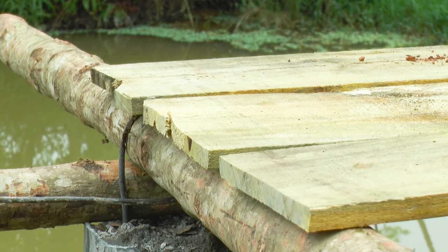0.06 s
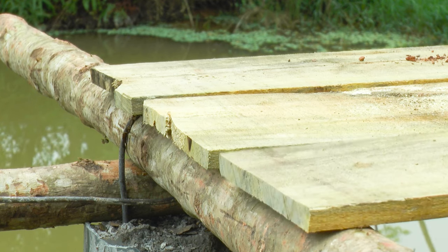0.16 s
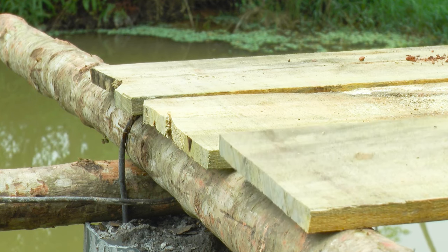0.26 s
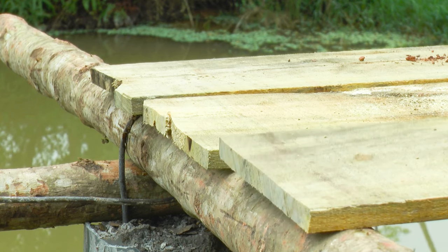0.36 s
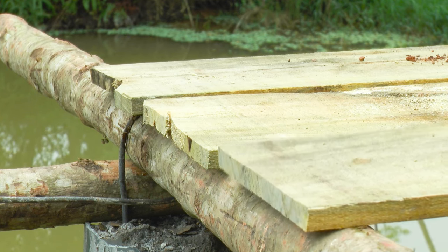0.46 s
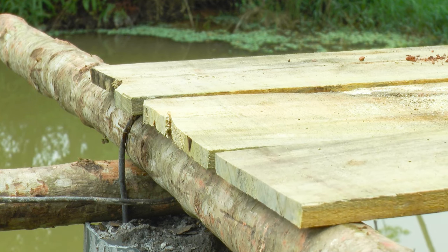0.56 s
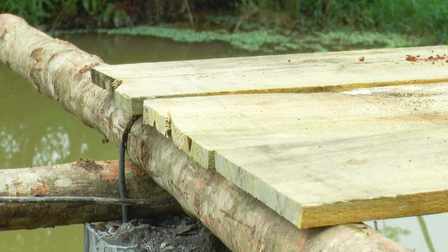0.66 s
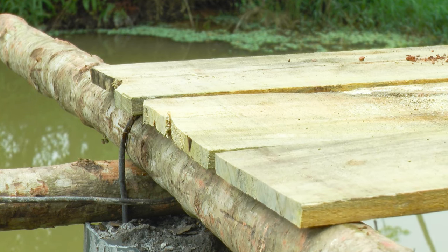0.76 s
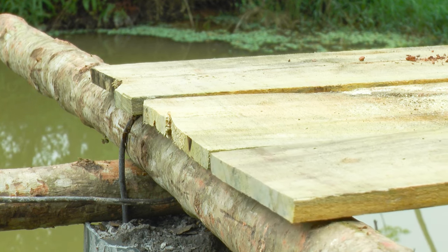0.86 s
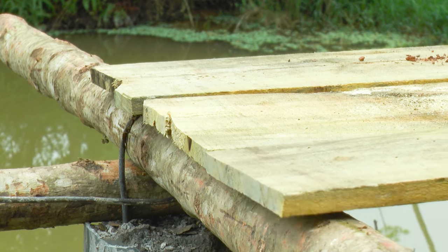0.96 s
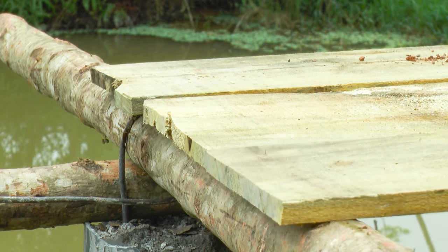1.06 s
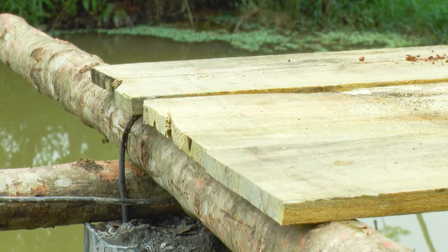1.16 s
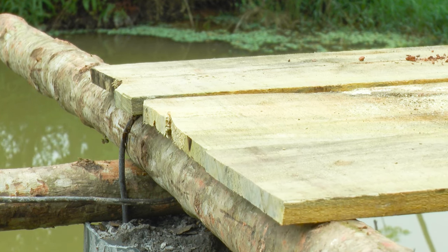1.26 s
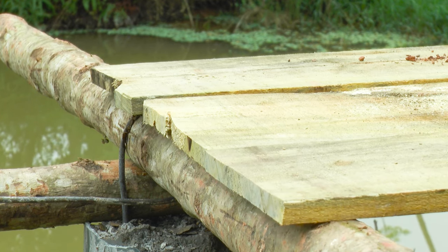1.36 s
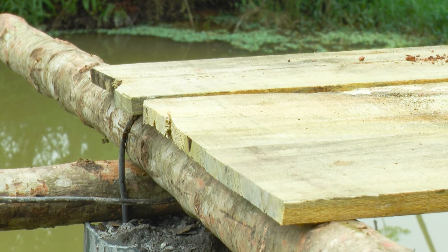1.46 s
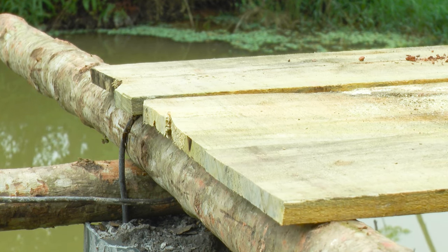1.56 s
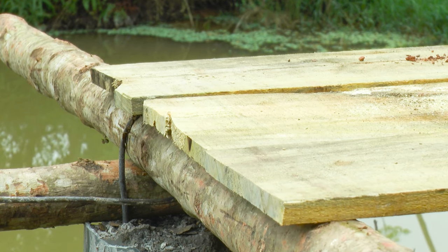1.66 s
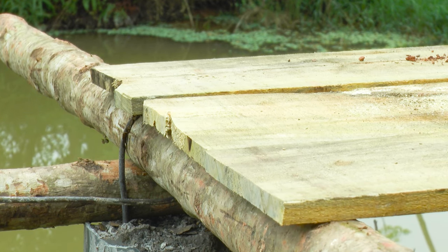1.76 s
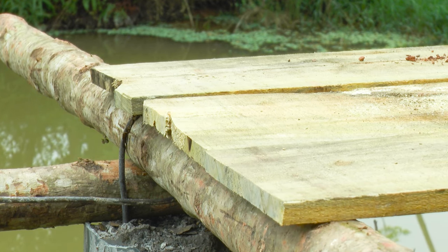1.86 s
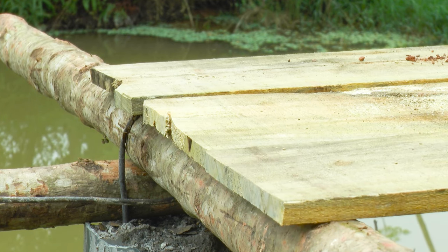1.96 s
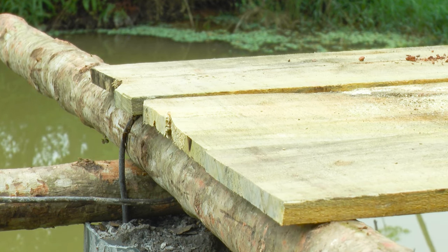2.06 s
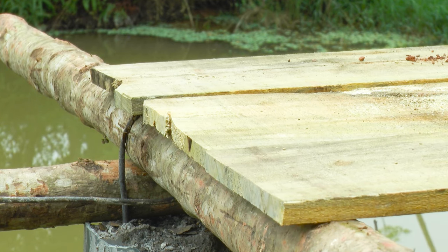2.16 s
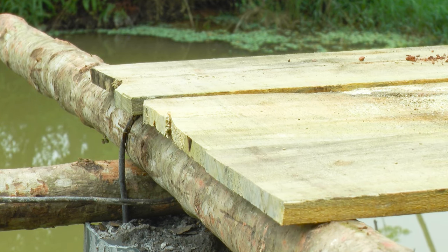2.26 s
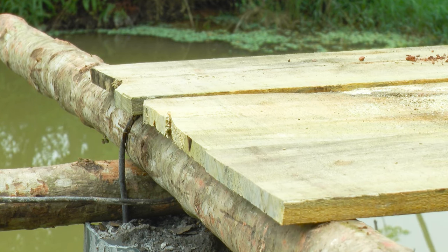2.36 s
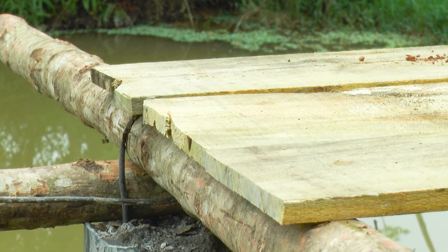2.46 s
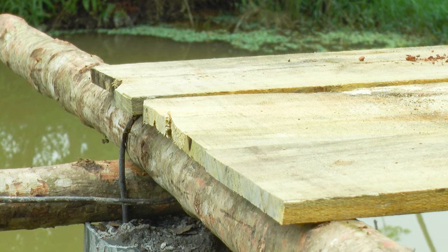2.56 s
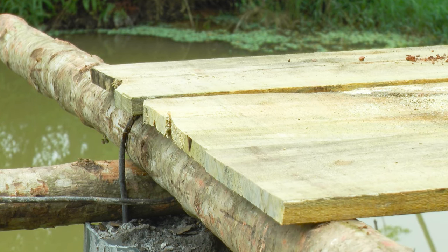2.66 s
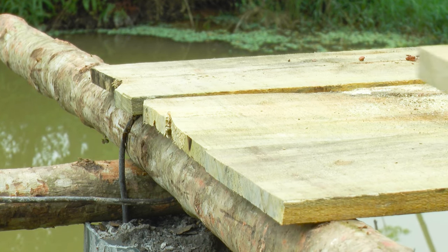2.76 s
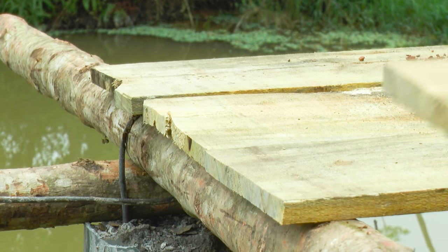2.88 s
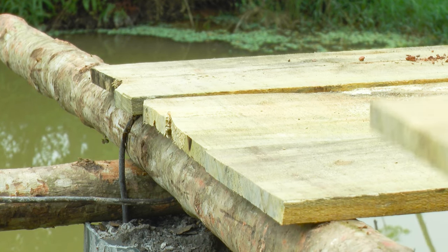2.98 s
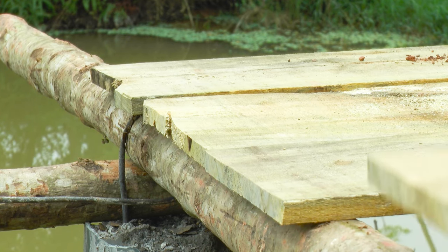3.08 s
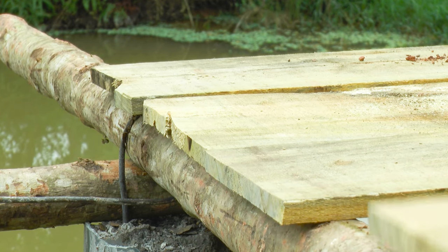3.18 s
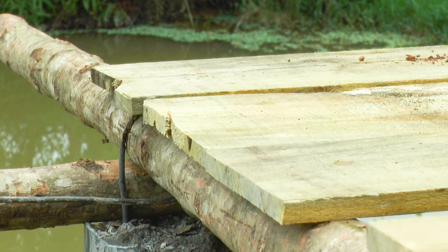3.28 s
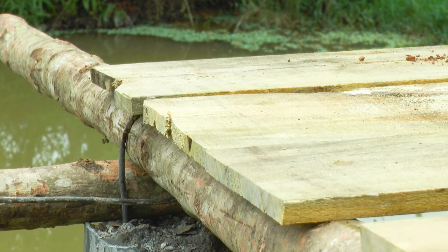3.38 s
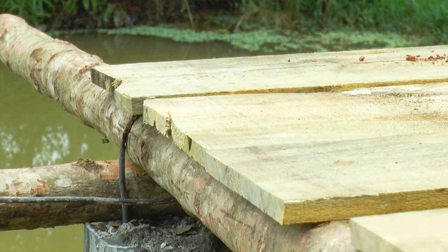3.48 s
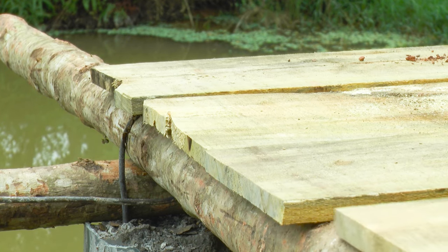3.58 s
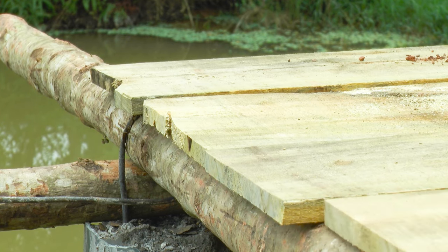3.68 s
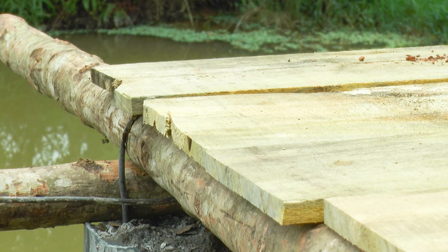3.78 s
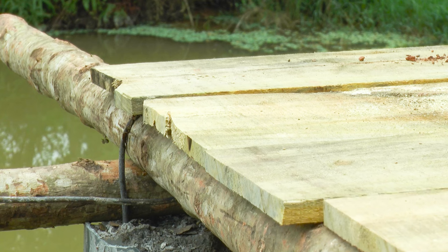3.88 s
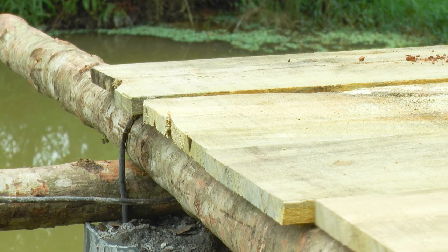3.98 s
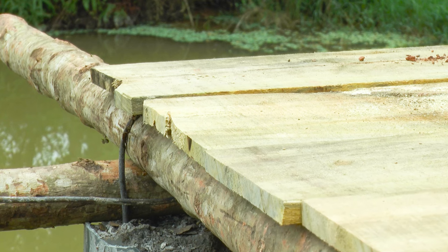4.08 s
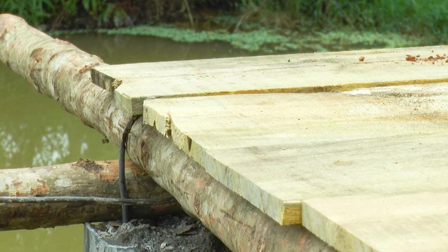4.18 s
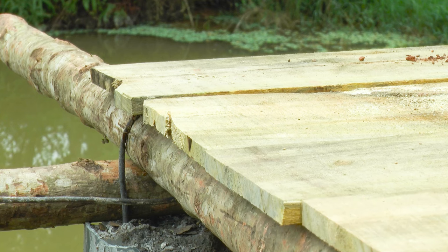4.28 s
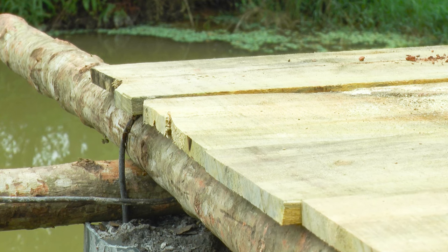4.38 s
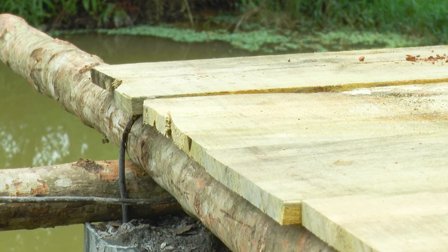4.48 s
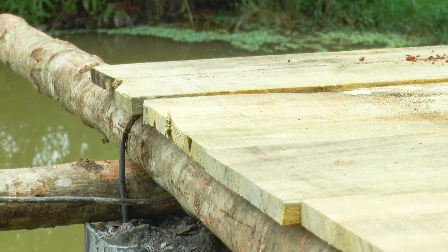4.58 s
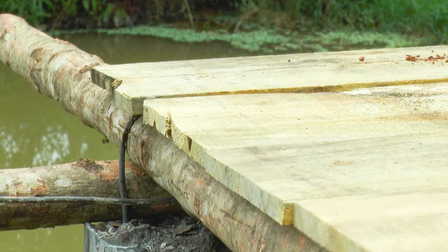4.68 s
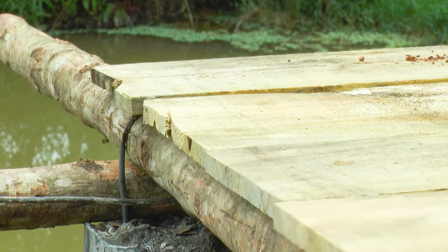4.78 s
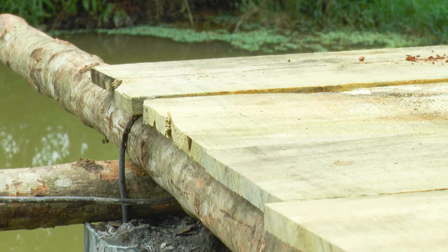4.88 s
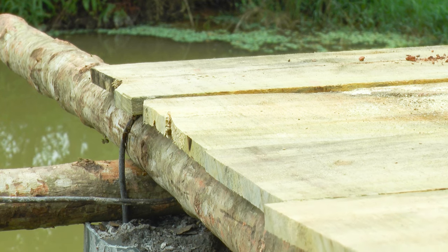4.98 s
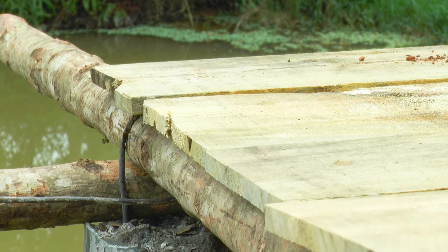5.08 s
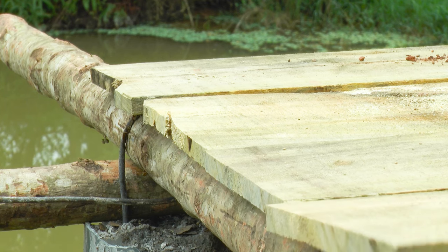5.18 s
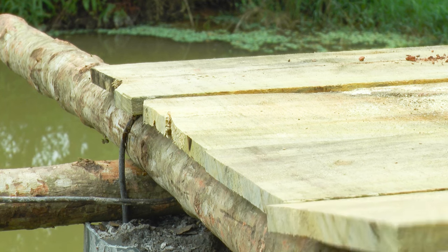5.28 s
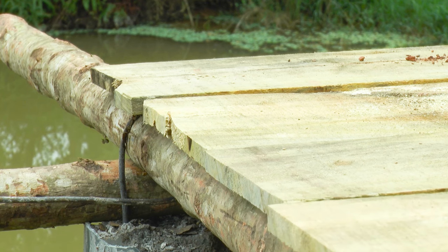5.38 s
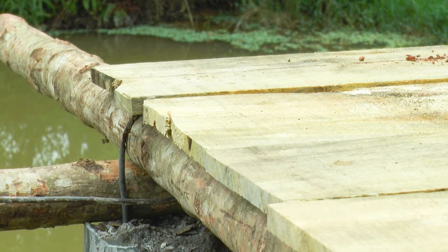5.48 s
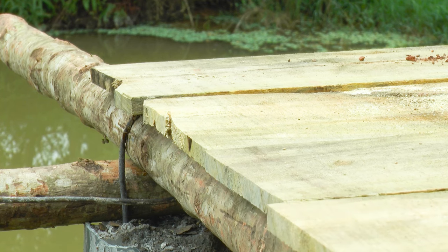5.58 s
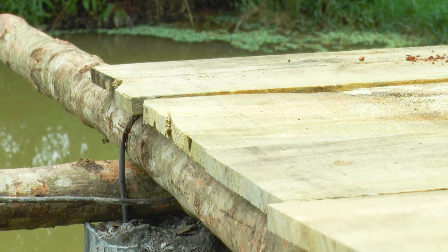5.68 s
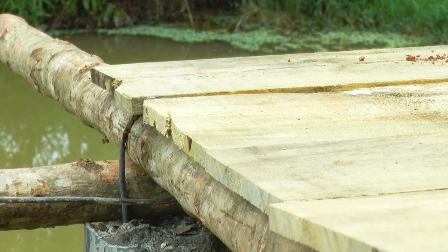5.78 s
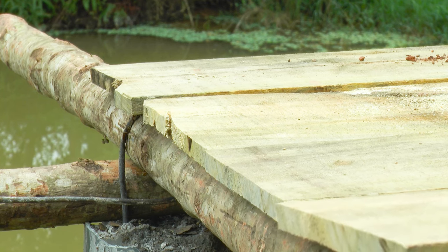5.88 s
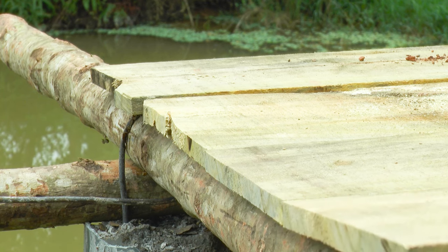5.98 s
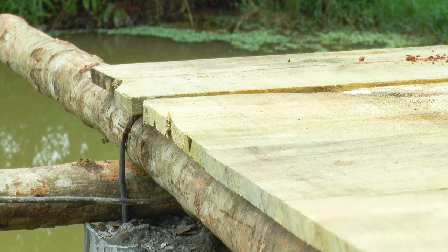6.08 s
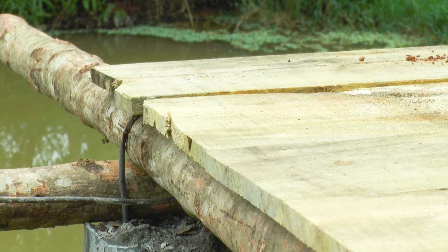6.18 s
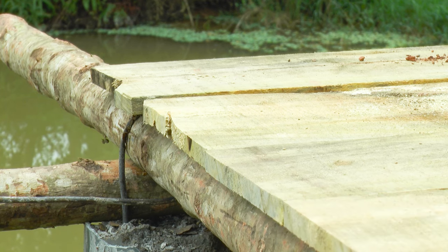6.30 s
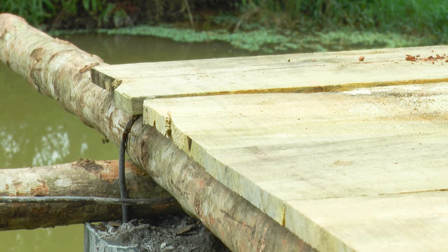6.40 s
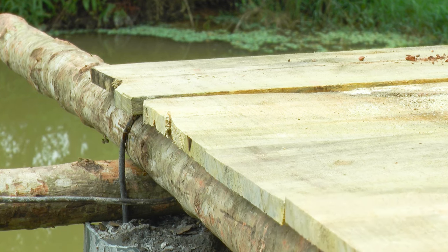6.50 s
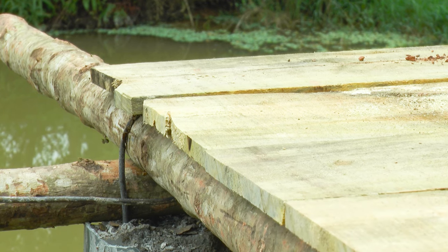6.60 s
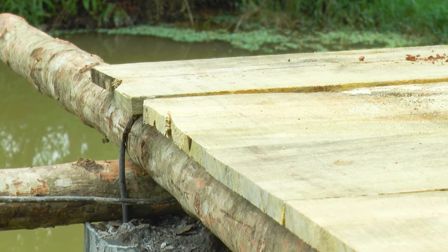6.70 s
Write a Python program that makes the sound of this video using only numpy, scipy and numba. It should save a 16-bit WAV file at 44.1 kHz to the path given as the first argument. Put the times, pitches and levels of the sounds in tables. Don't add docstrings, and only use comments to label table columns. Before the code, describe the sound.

Rough wooden boards scrape and clatter onto a log frame outdoors, with two loud drops, then hollow knocks over soft leafy air and distant engine hum.

```python
import sys
import numpy as np
from scipy import signal
from scipy.fft import rfft, irfft, next_fast_len
from scipy.io import wavfile
from scipy.ndimage import uniform_filter1d
from numba import njit

SR = 44100
rng = np.random.default_rng(int(sys.argv[2]) if len(sys.argv) > 2 else 0)


def digitize_waveform(pressure):
    field = np.atleast_2d(pressure).T
    bounded = np.clip(field, -1, 1)
    quanta = np.round(bounded * 32767).astype(np.int16)
    wavfile.write(sys.argv[1], SR, quanta)


def volts_from_db(level):
    exponent = np.asarray(level, float) / 20
    return 10 ** exponent


N = 297234

# (frequency [Hz], density [dB/Hz])
AIR_SPECTRUM = [(15, -53), (25, -10.5), (59, 1), (141, 1), (235, -10), (352, -8), (473, -17.5), (1550, -20),
                (2200, -23.5), (3300, -25), (4210, -30.5), (6310, -32.5), (8970, -41.5), (14200, -49.5),
                (15800, -54)]
# (time [s], gain [dB])
RECORDER_GAIN = [
    (0, 5),
    (1.1, 5.5),
    (1.14, -9.5),
    (1.6, -1.5),
    (2.4, 0),
    (3.2, 0.5),
    (4.5, 2.5),
    (5.5, 1.5),
    (6.74, 5.5),
]
# (time [s], drone level [dB], whine level [dB])
ENGINE_LEVELS = [
    (0, -71.5, -74),
    (3.5, -62, -88),
    (4.3, -58.5, -73.5),
    (4.5, -52, -73.5),
    (5.0, -61, -71),
    (5.3, -49, -64.5),
    (5.6, -54, -99),
    (6.2, -48, -80),
    (6.74, -55, -92),
]
# (peak time [s], swell [s], fade [s], level [dB])
LEAF_RUSTLES = [
    (3.53, 0.075, 0.074, -72),
    (3.63, 0.076, 0.076, -64.5),
    (3.735, 0.025, 0.018, -67),
]
# (time [s], level [dB], t60 [s])
SPLINTER_TICKS = [(0.621, -50, 0.0095), (1.952, -47, 0.013), (2.604, -38, 0.01), (2.6126, -46, 0.014),
                  (2.859, -61, 0.011), (3.322, -41, 0.0092), (3.378, -44.5, 0.011), (3.752, -49, 0.01),
                  (4.832, -40, 0.014), (5.7, -50, 0.0089), (6.385, -41, 0.07), (6.404, -43.5, 0.044),
                  (1.112, -43, 0.014)]
# (time [s], frequency [Hz], level [dB], fade to 1/e [cycles])
CORNER_PINGS = [(0.308, 2300, -55, 4.6), (0.31, 860, -47, 2.7), (0.601, 3540, -52, 4.6),
                (0.621, 2320, -44, 4), (0.621, 1600, -46, 4), (0.805, 286, -40, 1.2), (0.826, 2870, -54, 8),
                (0.978, 695, -28, 2.5), (0.992, 260, -46, 0.85), (1.052, 1710, -20.5, 3.3),
                (1.0765, 1830, -30, 5.1), (1.007, 209, -36.5, 2.2), (1.021, 188, -36.5, 2.4),
                (1.0906, 318, -25, 1.3), (1.0945, 790, -27, 4.9), (1.118, 1960, -51, 4),
                (1.95, 2820, -49.5, 3.9), (2.583, 3180, -55, 6), (2.858, 2440, -43, 3.6),
                (2.876, 1890, -48, 11), (3.2876, 330, -17, 1.07), (3.325, 2540, -31, 2.9),
                (3.3474, 2320, -31.5, 3), (3.377, 390, -18.5, 1.4), (3.379, 3500, -47, 3.8),
                (3.383, 1800, -33.5, 4), (3.452, 2000, -50, 2.8), (3.755, 2600, -50, 5),
                (4.7673, 2440, -41, 5), (4.784, 3270, -42, 6), (4.799, 2360, -35.5, 6.9),
                (4.835, 403, -18, 0.85), (4.843, 348, -19, 1.3), (4.888, 1590, -46, 4.5),
                (5.4439, 450, -33, 1.2), (5.471, 390, -27, 1.5), (5.895, 2300, -53, 4.4),
                (5.932, 2120, -57, 5.5), (6.051, 1800, -52, 4), (6.051, 3200, -52, 4.5),
                (6.2, 480, -41, 0.91), (6.388, 2330, -40, 6.4), (6.4063, 304, -34, 1.2),
                (6.672, 505, -34, 1.3), (6.682, 1980, -54, 4.7)]

# (peak time [s], swell [s], fade [s], rasp level [dB], bright edge re rasp [dB])
SLIDES = [(0.0, .01, 0.058, -49, -5.5), (0.085, 0.11, 0.081, -47, -3), (0.13, 0.059, 0.021, -59, 1),
          (0.63, 0.17, 0.029, -55, -0.5), (0.947, 0.084, 0.11, -45.5, -3), (0.99, 0.056, 0.05, -48.5, 3.5),
          (1.69, 0.1, 0.12, -59.5, 2), (1.95, 0.96, 0.99, -68.5, -3.5), (2.18, 0.038, 0.052, -60.5, -4),
          (2.226, 0.056, 0.052, -58, -5), (2.4, 0.093, 0.054, -61, -6), (2.483, 0.08, 0.042, -51.5, -3.5),
          (2.615, 0.072, 0.13, -57.5, -3), (3.05, 0.074, 0.033, -70, 1), (3.15, 0.047, 0.072, -61.5, -1),
          (3.215, 0.028, 0.04, -51, 4), (3.245, 0.045, 0.026, -50.5, 5), (3.56, 0.69, 0.13, -59.5, -4),
          (3.667, 0.14, 0.1, -52, -3.5), (4.106, 0.1, 0.056, -54, -1), (4.75, 0.054, 0.052, -56.5, -1),
          (4.88, 0.023, 0.09, -51, -4), (5.28, 0.026, 0.033, -63.5, -0.5), (5.55, 0.032, 0.043, -54, 0.5),
          (5.595, 0.047, 0.032, -56.5, -0.5), (5.91, 0.093, .06, -64, 0.5), (6.04, 0.067, 0.034, -69, 8),
          (6.29, 0.033, 0.075, -55.5, -4), (6.34, 0.027, .05, -47.5, -6.5), (6.37, 0.054, .04, -44.5, -14),
          (6.395, 0.027, 0.048, -42, -8.5), (6.47, 0.041, 0.055, -59.5, -1), (6.652, 0.03, 0.027, -57, 0.5),
          (6.683, 0.023, 0.026, -48.5, -4)]
# (time [s], fade [s], rasp level [dB], bright edge re rasp [dB])
SCUFFS = [(0.311, 0.047, -57.5, 3), (1.13, 0.3, -54.5, -33), (1.25, 0.027, -49, -3.5),
          (1.953, 0.011, -64, 2), (2.159, 0.04, -63, 3), (2.858, 0.082, -52.5, 4.5),
          (3.753, 0.035, -51.5, 0.5), (5.699, 0.033, -55.5, -5), (5.448, .05, -55, 3.5),
          (0.62, .02, -55, -1), (0.975, .03, -51, 0), (6.201, 0.058, -61, -10), (6.261, .15, -62, -1)]
# (time [s], fade [s], rumble level [dB])
ROCKS = [(0.02, 0.7, -58.5), (0.314, 0.065, -47), (0.8, 0.19, -55), (0.986, 0.23, -44), (2.47, 0.082, -55),
         (6.385, 0.039, -41), (1.138, 0.098, -45), (1.256, 0.06, -39.5), (2.863, 0.048, -47.5),
         (3.51, 0.45, -54.5), (3.766, 0.059, -62), (4.117, 0.055, -52), (4.89, 0.068, -49),
         (5.527, 0.098, -41.5), (6.205, 0.073, -42), (6.405, 0.059, -34.5), (6.674, 0.27, -48.5)]
# (peak time [s], swell [s], fade [s], hiss level [dB])
DUST_SPITS = [(0.981, .008, 0.035, -54), (1.017, .005, .015, -57), (1.058, .004, 0.012, -56),
              (1.085, 0.013, 0.0097, -55.5), (1.69, 0.1, .2, -74), (2.613, 0.0061, 0.02, -48.5),
              (3.287, .003, 0.01, -52.5), (3.38, .01, 0.076, -64), (3.62, 0.14, .12, -70),
              (3.668, .01, 0.033, -59), (4.79, 0.059, 0.07, -58.5), (4.835, .004, 0.032, -58.5)]
# (frequency [Hz], density [dB/Hz])
RASP_SPECTRUM = [(290, -23), (500, 1), (877, 0), (1020, -0.5), (1340, -1), (1770, -1.5), (2890, -5.5),
                 (4460, -21), (5500, -20.5), (7150, -35), (12100, -120)]
# (frequency [Hz], level [dB])
RASP_RESONANCES = [(800, -13), (1010, -8.5), (1220, -12), (1560, -9.5), (2150, -12), (2900, -15),
                   (3400, -9.5)]
# (time [s], frequency [Hz], level re rasp [dB])
RUB_SONG = [(0.05, 1800, -1), (0.6, 2300, -7.5), (0.89, 1690, 1), (0.98, 2080, -4), (1.7, 3130, -20),
            (2.2, 1740, -1.5), (2.47, 980, -21), (2.87, 1900, -6), (3.23, 1760, -11.5), (3.65, 1780, -6),
            (4.1, 1620, -5.5), (5.55, 2030, -5.5), (6.29, 1800, -0.5), (6.34, 1690, -2), (6.39, 2340, -11),
            (6.68, 2000, -15)]

POSITION_START_S = [
    0,
    2.9,
    4.4,
    5.2,
]
GRIT_RE_RING_DB = [-23, -46, -19, -28.5]
BLOW_T60_S = [0.13, 0.12, 0.11, 0.1]
TAP_T60_S = [0.14, 0.2, 0.1, 0.14]
# (frequency [Hz], level [dB])
FIRST_DROP_MODES = [(125, -5.5), (175, -4), (288, 3.5), (371, 1), (484, 7), (545, 6.5), (630, -0.5),
                    (748, 4), (888, 1.5), (1000, 7)]
# (frequency [Hz], level [dB])
SECOND_DROP_MODES = [(110, -15.5), (167, -3), (206, -1), (290, -3.5), (346, -4), (380, -3.5), (417, 2),
                     (480, 5), (576, -3), (757, -8.5), (877, -6), (990, -6)]
# (frequency [Hz], level [dB])
SHOVE_MODES = [(150, -5.5), (230, -8), (290, 5), (380, 2), (477, 0), (581, -8), (641, -14), (877, -11)]
# (frequency [Hz], level [dB])
SET_DOWN_MODES = [(140, -3.5), (200, -4), (266, 4.5), (338, -5), (472, 5), (540, -3), (707, -5), (996, -11)]
# (frequency [Hz], density [dB/Hz])
FIRST_DROP_CROWD = [(35, -53), (60, -64), (201, -27), (233, -35), (284, 9), (584, -12.5), (739, -1),
                    (1760, -16.5), (4500, -73), (5850, -78), (9900, -120)]
# (frequency [Hz], density [dB/Hz])
SECOND_DROP_CROWD = [(35, -51), (60, -15), (201, 7), (284, 8), (506, 4), (1020, -2.5), (2000, -21),
                     (2570, -27), (4500, -64), (5850, -85), (9900, -120)]
# (frequency [Hz], density [dB/Hz])
SHOVE_CROWD = [(35, -55), (60, -35), (151, 16), (241, -9), (299, 6), (407, -1.5), (870, -11), (1080, -18),
               (4500, -53.5), (5850, -73), (9900, -120)]
# (frequency [Hz], density [dB/Hz])
SET_DOWN_CROWD = [(35, -39), (60, -15), (205, -12), (269, -5.5), (400, 5), (470, 4), (1020, -19.5),
                  (1160, -21), (4500, -45), (5850, -79), (9900, -120)]
# (time [s], crack peak [dB], crack frequency [Hz], ring level [dB])
TAPS = [(0.309, -28, 820, -39.5), (0.62, -37, 2270, -39), (0.802, -41, 540, -47), (0.978, -24, 515, -25.5),
        (1.016, -32, 400, -38), (1.253, -54, 412, -63), (1.949, -52, 2650, -57), (2.468, -47, 950, -36.5),
        (2.609, -53, 1070, -37.5), (2.856, -35, 625, -71), (3.214, -34, 404, -41.5), (3.668, -52, 700, -36),
        (3.754, -39, 1660, -59), (4.097, -31, 332, -58), (5.273, -54, 775, -51), (5.697, -46, 754, -64),
        (5.889, -46, 425, -46), (6.05, -45, 1830, -47.5), (6.199, -22, 500, -28.5), (6.213, -23, 380, -62),
        (6.226, -31, 385, -43.5), (6.386, -36, 428, -29), (6.404, -19.5, 416, -29), (6.615, -24, 416, -32),
        (6.668, -42, 450, -34)]
# (time [s], crack peak [dB], crack frequency [Hz], ring level [dB], ring tilt [dB/octave])
FIRST_BLOWS = [
    (1.0528, -28, 1590, -22.5, 11.5),
    (1.055, -18, 565, -23, -5),
    (1.066, -22.5, 402, -22.5, -5),
    (1.077, -35, 1800, -29, 11),
    (1.083, -18, 880, -23, -3),
    (1.0882, -26, 432, -23.5, 2),
    (1.095, -21.5, 810, -34, -3),
    (1.1131, -12, 2000, -31, 3),
    (1.128, -30, 1040, -34.5, 7),
]
# (time [s], crack peak [dB], crack frequency [Hz], ring level [dB], ring tilt [dB/octave])
SECOND_BLOWS = [(3.287, -15, 780, -23.5, 4.5), (3.2943, -14.5, 1160, -26, -7.5),
                (3.304, -25.5, 378, -22.5, -1.5), (3.326, -10.5, 930, -22.5, 3),
                (3.3465, -16.5, 910, -24.5, 5), (3.357, -22.5, 434, -28, -2.5),
                (3.3766, -14.5, 590, -25, 3), (3.3857, -16.5, 710, -20, 0.5), (3.409, -28.5, 624, -29, 5),
                (3.431, -41, 393, -27, -5.5), (3.456, -31, 505, -34.5, -6), (3.493, -35.5, 302, -43, -3),
                (4.768, -21, 980, -21, 3.5), (4.784, -41, 495, -22.5, 6.5), (4.798, -23, 500, -19.5, -4.5),
                (4.814, -18.5, 514, -22.5, -6), (4.834, -17.5, 520, -19.5, 1.5), (4.8404, -14, 420, -25, 0),
                (4.856, -27, 474, -26.5, 3), (5.434, -43, 1190, -42.5, 7.5), (5.4425, -16, 520, -20, 1.5),
                (5.458, -26, 462, -25, -1.5), (5.468, -31, 420, -22.5, -2)]
# (start [s], end [s], lower edge [Hz])
TREBLE_GAPS = [(1.05, 1.065, 12850), (1.118, 1.62, 12850), (1.12, 1.135, 10500), (1.76, 2.58, 14900),
               (2.66, 2.84, 14900), (2.845, 2.86, 12850), (3.28, 3.293, 12850), (3.315, 3.33, 12850),
               (3.385, 3.4, 12850), (3.74, 3.755, 12850), (3.95, 4.05, 14900), (4.2, 4.5, 14900),
               (4.76, 4.775, 12850), (5.445, 5.46, 12850), (6.19, 6.205, 12850)]

SLIDE_ROUNDNESS, KNOCK_ROUNDNESS = 1.85, 0.74
IDLE_RASP_DB, IDLE_RUMBLE_DB, IDLE_HISS_DB = -81.5, -67, -76


def level(x, rms_db):
    return x * volts_from_db(rms_db) / np.sqrt(np.mean(x ** 2))


def curve(table):
    time_s, *columns = np.transpose(table)
    return [np.interp(np.arange(N) / SR, time_s, c) for c in columns]


def colour(x, points):
    hz, db = np.transpose(points)
    size = next_fast_len(N)
    f = np.maximum(np.arange(size // 2 + 1) * SR / size, 1)
    response = volts_from_db(np.interp(np.log(f), np.log(hz), db))
    return level(irfft(rfft(x, size) * response, size)[:N], 0)


def walk(rate_hz):
    hold = int(SR / rate_hz)
    steps = np.repeat(rng.standard_normal(N // hold + 1), hold)
    return 1.42 * uniform_filter1d(uniform_filter1d(steps, hold), hold)[:N]


def strokes(peak_s, swell_s, fade_s, peak_db, roundness):
    power, t = np.zeros(N), np.arange(N) / SR
    for s, swell, fade, db in np.broadcast(peak_s, swell_s, fade_s, peak_db):
        near = slice(max(int((s - 3 * swell) * SR), 0), int((s + 3 * fade) * SR))
        away = np.maximum((s - t[near]) / swell, (t[near] - s) / fade)
        power[near] += volts_from_db(db - 20 * away ** roundness) ** 2
    return np.sqrt(power)


@njit
def add_modes(out, start, hz, gain, fade_per_s, rise_s, phase):
    for k in range(len(hz)):
        turn = np.exp(2j * np.pi * hz[k] / SR - fade_per_s[k] / SR)
        rise = np.exp(-1 / (rise_s[k] * SR))
        z, lack = gain[k] * np.exp(1j * phase[k]), 1.
        for i in range(start, min(start + int(6.5 * SR / fade_per_s[k]), len(out))):
            out[i] += z.imag * (1 - lack)
            z, lack = z * turn, lack * rise + 1e-18


def outdoors():
    swell = walk(0.81)
    air = colour(rng.standard_normal(N), AIR_SPECTRUM)
    edges_hz = 22 * 2 ** np.arange(0, 9.6, .5)
    out = 0
    for lo, hi in zip(edges_hz[:-1], edges_hz[1:]):
        band = signal.sosfilt(signal.butter(2, [lo, hi], "band", fs=SR, output="sos"), air)
        out = out + band * volts_from_db(.6 * swell + .7 * walk(12))
    return level(out, -56.5)


def engine():
    drone_db, whine_db = curve(ENGINE_LEVELS)
    drone_hz = 150.5 * (1 + 0.04356 * walk(15))
    whine_hz = 764 * (1 + 0.0014 * walk(4.13))
    drone = np.sin(2 * np.pi * np.cumsum(drone_hz) / SR) * volts_from_db(drone_db - 3.0 + 1.7 * walk(19))
    whine = np.sin(2 * np.pi * np.cumsum(whine_hz) / SR) * volts_from_db(whine_db + 1.0 + 1.3 * walk(27))
    return drone + whine


def ticks():
    t, envelope = np.arange(int(.05 * SR)) / SR, np.zeros(N)
    for s, db, t60_s in SPLINTER_TICKS:
        i = int(s * SR)
        envelope[i:i + len(t)] += volts_from_db(db) * np.exp(-np.log(1000) * t / max(t60_s, .002))
    spectrum = [(500, -24), (1500, 17.5), (3500, 5.0), (8000, -4), (15500, -38)]
    return envelope * colour(rng.standard_normal(N), spectrum)


def pings():
    out = np.zeros(N)
    for s, ping_hz, db, cycles in CORNER_PINGS:
        hz = np.array([1. * ping_hz])
        gain = np.array([2.12 * volts_from_db(db)])
        add_modes(out, int(s * SR), hz, gain, hz / max(cycles, .3), 0.83 / hz, 0 * hz)
    return out


def grains(share, scatter_db):
    slips = rng.random(N) < share
    return slips * rng.standard_normal(N) * volts_from_db(scatter_db * rng.exponential(size=N))


def song(slips):
    hz, db = curve(RUB_SONG)
    width_hz = 216
    carrier = np.exp(2j * np.pi * np.cumsum(hz) / SR)
    keep = np.exp(-np.pi * width_hz / SR)
    resonance = signal.lfilter([1], [1, -2 * keep, keep ** 2], slips / carrier)
    return volts_from_db(db) * level((resonance * carrier).real, 0)


def pressure(edge):
    s, swell_s, fade_s, db, edge_db = np.transpose(SLIDES)
    slides = strokes(s, swell_s, fade_s, db + edge * edge_db, SLIDE_ROUNDNESS)
    s, fade_s, db, edge_db = np.transpose(SCUFFS)
    scuffs = strokes(s, 0.0032, fade_s, db + edge * edge_db, KNOCK_ROUNDNESS)
    return np.hypot(slides, scuffs)


def grit():
    s, ring_db = np.array(FIRST_BLOWS + SECOND_BLOWS)[:, [0, 3]].T
    position = np.searchsorted(POSITION_START_S, s) - 1
    kicks = np.zeros(N)
    kicks[(s * SR).astype(int)] = volts_from_db(ring_db + np.array(GRIT_RE_RING_DB)[position]) ** 2
    fade_s = 0.0083
    return np.sqrt(signal.lfilter([1], [1, -np.exp(-1 / (fade_s * SR))], kicks))


def rasping(slips):
    plain = colour(slips, RASP_SPECTRUM)
    rasp = plain
    for hz, db in RASP_RESONANCES:
        rasp = rasp + 2 * volts_from_db(db) * signal.lfilter(*signal.iirpeak(hz, 14, fs=SR), plain)
    return level(rasp, 0) * volts_from_db(.7 * walk(80))


def sliding():
    idle = volts_from_db(0.99 * curve(RECORDER_GAIN)[0])
    slips = grains(.25, 1.7)
    rasp = rasping(slips)
    dull = level(signal.sosfilt(signal.butter(3, 1900, "low", fs=SR, output="sos"), rasp), 0)
    bright = level(signal.sosfilt(signal.butter(3, 1900, "high", fs=SR, output="sos"), rasp), 0)
    push, edge = pressure(0), pressure(0.94)
    rub = push * (dull + song(slips)) + edge * bright
    rub = rub + (grit() + volts_from_db(IDLE_RASP_DB) * idle) * rasp

    rumble = colour(grains(.1, 3.2), [(90, 2.0), (200, 8), (300, 6.5), (500, -3.5), (800, -15.0), (1200, -49.0)])
    rock_s, rock_fade_s, rock_db = np.transpose(ROCKS)
    rocking = strokes(rock_s, 0.0079, rock_fade_s, rock_db, KNOCK_ROUNDNESS)
    rocking = rocking + volts_from_db(IDLE_RUMBLE_DB) * idle

    hiss = colour(slips, [(3500, -44), (4500, -8.0), (6300, 2.5), (7900, 0.5), (9000, -6.5), (12000, -9.5),
                          (15500, -17), (16500, -73)])
    dust = np.hypot(volts_from_db(-19) * edge, strokes(*np.transpose(DUST_SPITS), KNOCK_ROUNDNESS))
    dust = np.hypot(dust, volts_from_db(IDLE_HISS_DB) * idle)

    rustle = colour(slips, [(5000, -29), (6400, -1), (7900, 6.5), (9300, -8), (12000, -23)])
    leaves = strokes(*np.transpose(LEAF_RUSTLES), SLIDE_ROUNDNESS)
    return rub + rocking * rumble + dust * hiss + leaves * rustle


def board(main, crowd, crowd_db):
    gap_hz = 85
    hz = gap_hz * (np.arange(1, 50) + rng.uniform(-0.34, 0.34, size=49))
    crowd_hz, density_db = np.transpose(crowd)
    db = np.interp(np.log(hz), np.log(crowd_hz), density_db) + crowd_db
    db = db + 6 * np.log10(hz / 500)
    db = db - 9 * (hz < 660)
    return np.hstack([np.transpose(main), [hz, db]])


def chirp(t, crack_hz):
    fall_hz = max(2000 - crack_hz, 0)
    cycles = 0.848 * crack_hz * t + fall_hz * 0.000848 * (1 - np.exp(-t / 0.0011))
    crack = np.sin(2 * np.pi * cycles) * (crack_hz * t) ** 2 * np.exp(-crack_hz * t / 0.57)
    return crack / np.abs(crack).max()


def blows(events, boards, t60_s, crack_trim_db, ring_trim_db, linger=0):
    out, t = np.zeros(N + SR), np.arange(int(.03 * SR)) / SR
    chance = rng.standard_normal((len(events), 3, 64))
    for (s, peak_db, crack_hz, ring_db, tilt_db), luck in zip(events, chance):
        position = np.searchsorted(POSITION_START_S, s) - 1
        hz, db = boards[position]
        spot, detune, phase = luck[:, :len(hz)]
        i = int(s * SR)
        out[i:i + len(t)] += volts_from_db(peak_db + crack_trim_db) * chirp(t, crack_hz)
        share = volts_from_db(db + tilt_db * np.log2(hz / 500) + 2.2 * spot)
        gain = volts_from_db(ring_db + ring_trim_db) * share / np.sqrt(np.sum(share ** 2))
        ring_s = max(t60_s[position] * (1 + linger * (ring_db + 47.0)), .02)
        fade_per_s = np.log(1000) / ring_s * (np.maximum(hz, 220) / 500) ** 0.65
        rise_s = 0.0024 * (500 / hz) ** 0.33
        add_modes(out, i, hz * (1 + 0.012 * detune), gain, fade_per_s, rise_s, .9 * phase)
    return out[:N]


def knocking():
    lying = [board(FIRST_DROP_MODES, FIRST_DROP_CROWD, crowd_db=9.5),
             board(SECOND_DROP_MODES, SECOND_DROP_CROWD, crowd_db=-2.5),
             board(SHOVE_MODES, SHOVE_CROWD, crowd_db=1.7),
             board(SET_DOWN_MODES, SET_DOWN_CROWD, crowd_db=1.5)]
    taps = []
    for s, peak_db, crack_hz, ring_db in TAPS:
        tilt_db = -3 + 1.7 * np.log2(crack_hz / 500)
        taps.append((s, peak_db, crack_hz, ring_db, tilt_db))
    heavy = blows(FIRST_BLOWS + SECOND_BLOWS, lying, BLOW_T60_S, crack_trim_db=-1.5, ring_trim_db=1.5)
    light = blows(taps, lying, TAP_T60_S, crack_trim_db=-11.0, ring_trim_db=-4.0, linger=0.015)
    return heavy + light


def echo(x):
    t = np.arange(int(.25 * SR)) / SR
    t60_s, delay_s = 0.07, .003
    echoes = rng.standard_normal(len(t)) * np.exp(-np.log(1000) * t / t60_s) * (t > delay_s)
    return signal.fftconvolve(x, echoes / np.sqrt(np.sum(echoes ** 2)))[:N]


def scene():
    background = volts_from_db(curve(RECORDER_GAIN)[0]) * outdoors() + engine()
    boards = knocking()
    mix = background + ticks() + pings() + sliding() + boards + volts_from_db(-11.5) * echo(boards)
    return mix[None]


def treble_dropouts(x):
    size, top_hz = next_fast_len(N), 15770
    f, t = np.fft.rfftfreq(size, 1 / SR), np.arange(N) / SR
    lines = rfft(x, size)
    out = irfft(lines * (f < top_hz), size)[:, :N]
    for lo, hi in ((10500, 12850), (12850, 14900), (14900, top_hz)):
        gone = sum((t > a) & (t < b) for a, b, above_hz in TREBLE_GAPS if above_hz <= lo) > 0
        band = irfft(lines * (f >= lo) * (f < hi), size)[:, :N]
        out = out - uniform_filter1d(1. * gone, size=200) * band
    return out


def band_limit(x):
    return signal.sosfilt(signal.butter(12, 15750, fs=SR, output="sos"), x)


def record(dry):
    size = next_fast_len(N)
    f = np.fft.rfftfreq(size, 1 / SR)
    ripple = 1 + .42 * np.clip((f - 8200) / 1200, 0, 1) * np.cos(2 * np.pi * (f - 11905) / 401)
    bass_cut = 1 / np.sqrt(1 + (36 / np.maximum(f, 1)) ** 6)
    heard = irfft(rfft(dry, size) * ripple * bass_cut, size)[:, :N]
    rounded = 0.51 * np.tanh(heard / 0.6)
    return band_limit(treble_dropouts(rounded))


dry = scene()
out = record(dry)
digitize_waveform(out)
```